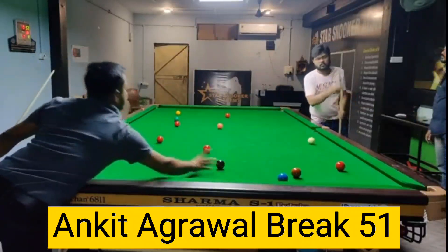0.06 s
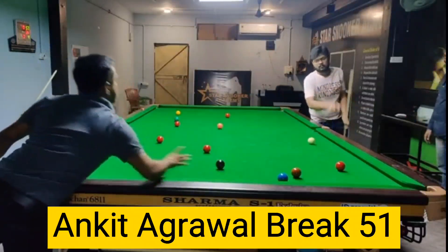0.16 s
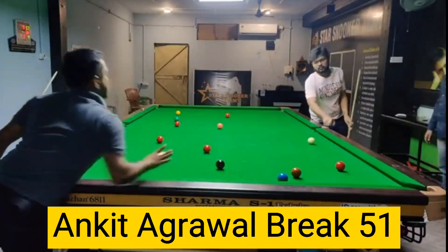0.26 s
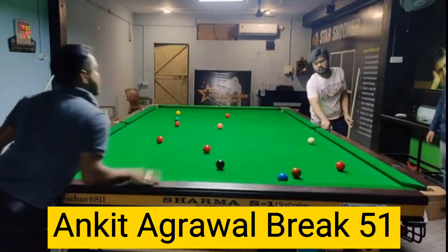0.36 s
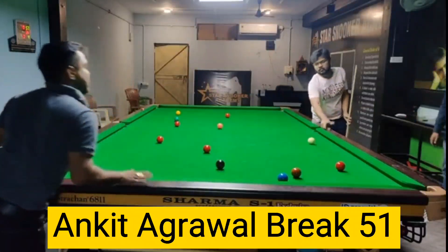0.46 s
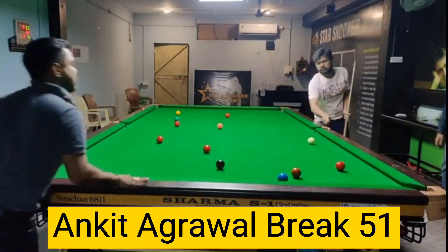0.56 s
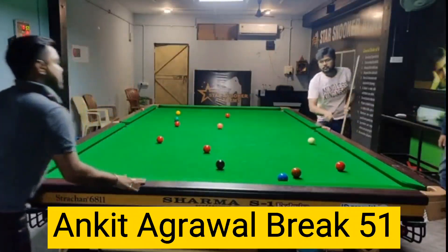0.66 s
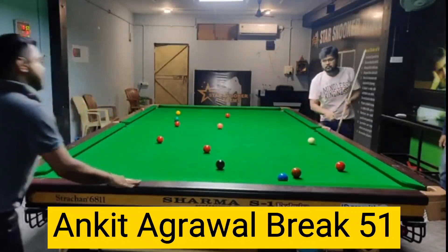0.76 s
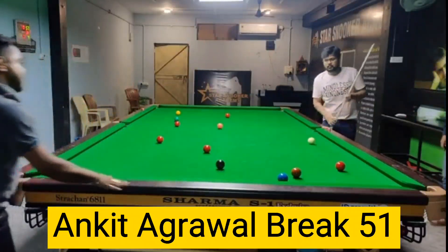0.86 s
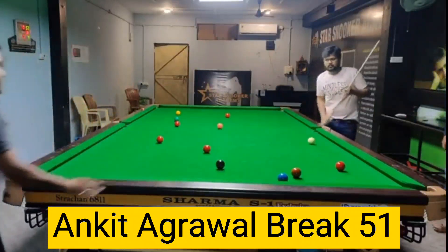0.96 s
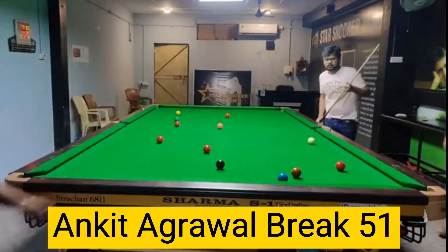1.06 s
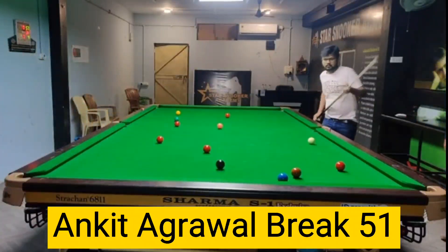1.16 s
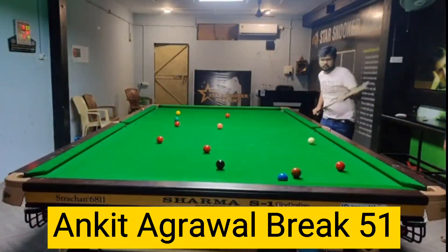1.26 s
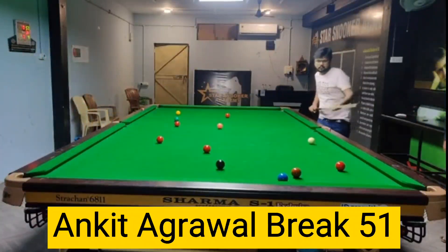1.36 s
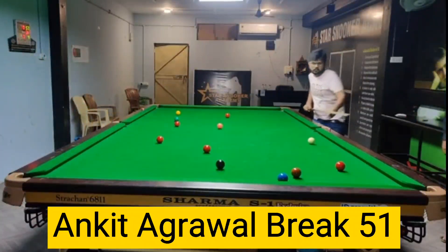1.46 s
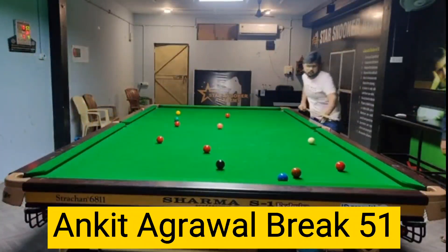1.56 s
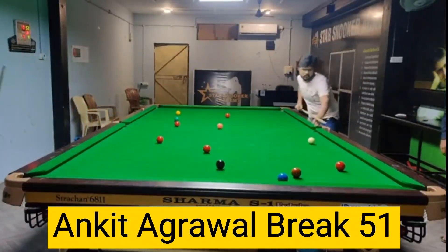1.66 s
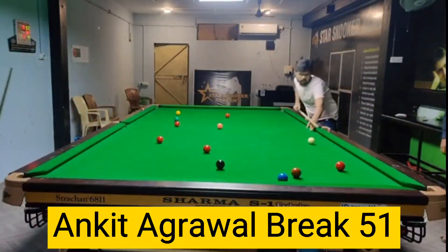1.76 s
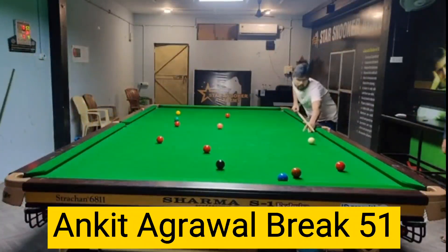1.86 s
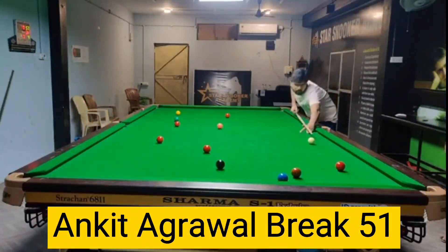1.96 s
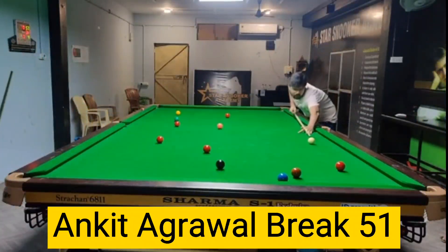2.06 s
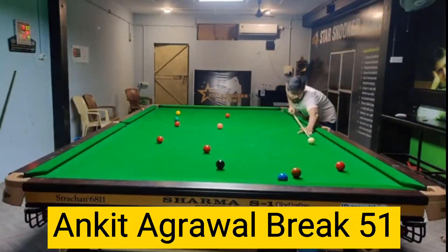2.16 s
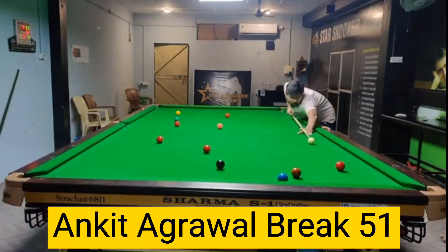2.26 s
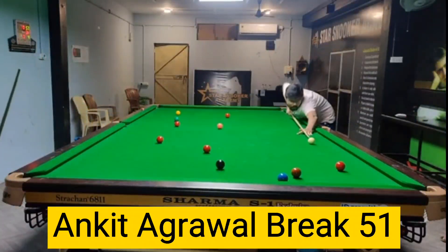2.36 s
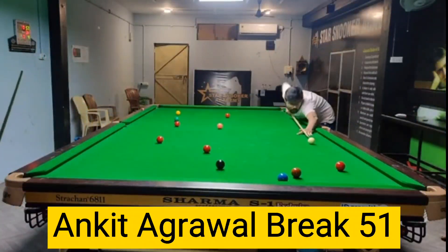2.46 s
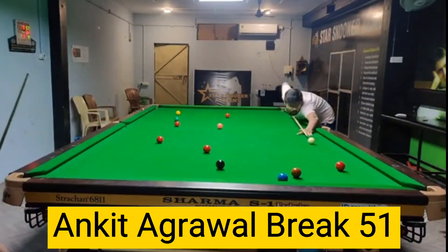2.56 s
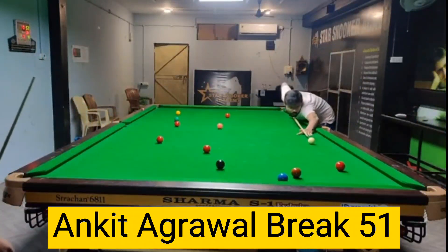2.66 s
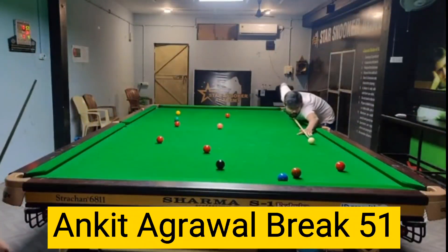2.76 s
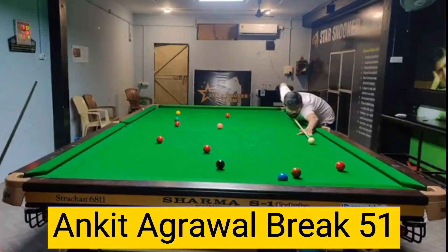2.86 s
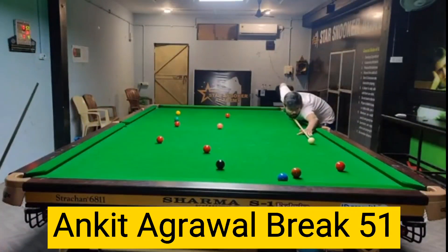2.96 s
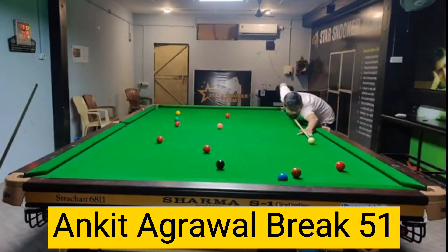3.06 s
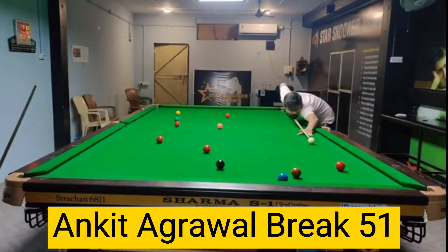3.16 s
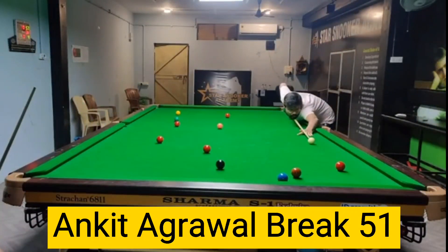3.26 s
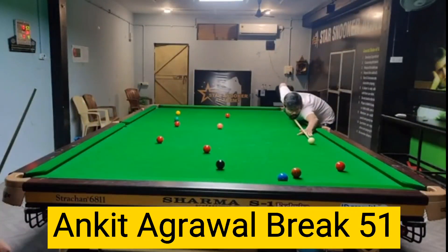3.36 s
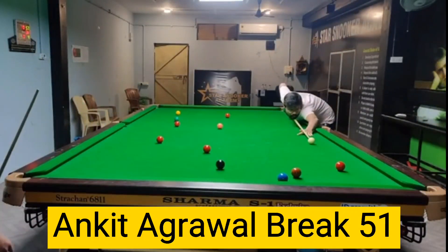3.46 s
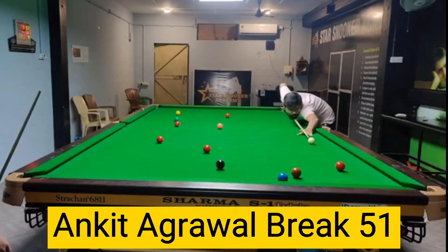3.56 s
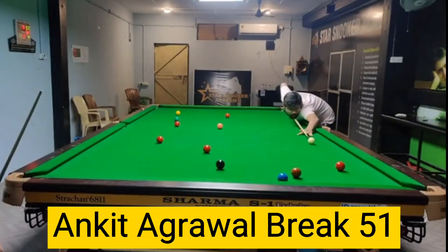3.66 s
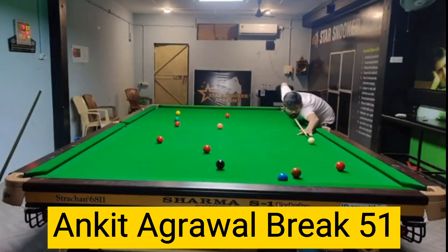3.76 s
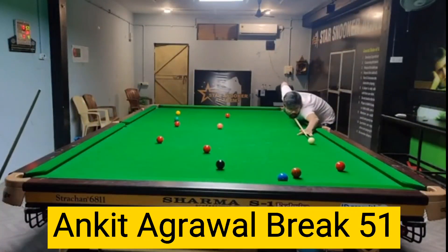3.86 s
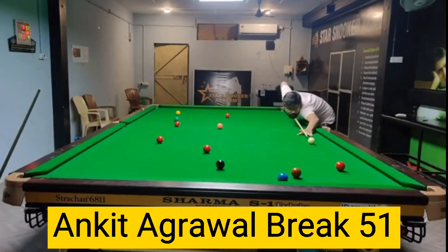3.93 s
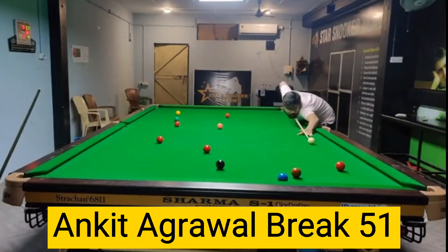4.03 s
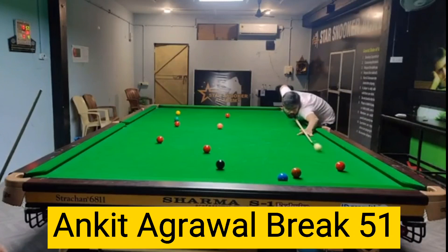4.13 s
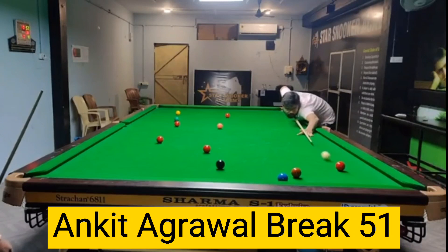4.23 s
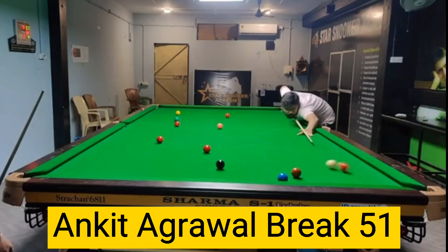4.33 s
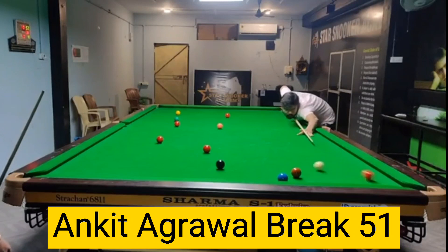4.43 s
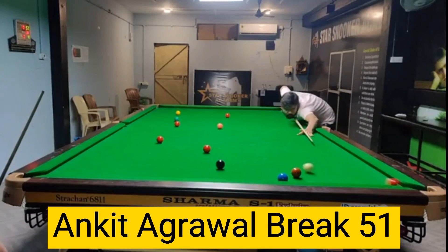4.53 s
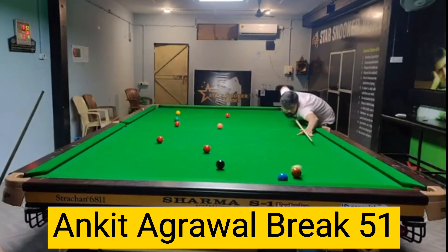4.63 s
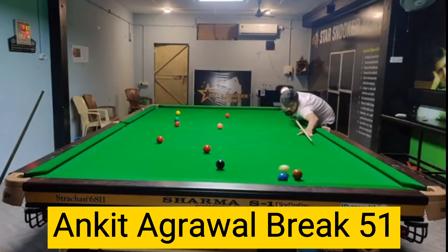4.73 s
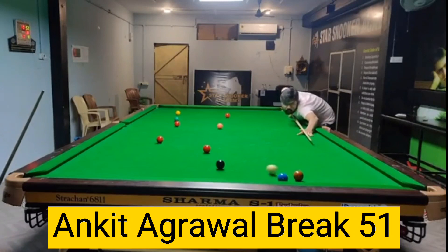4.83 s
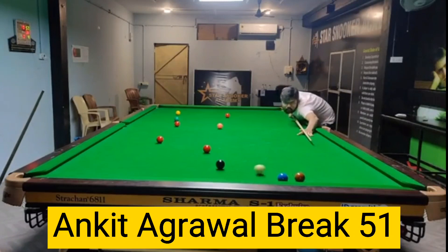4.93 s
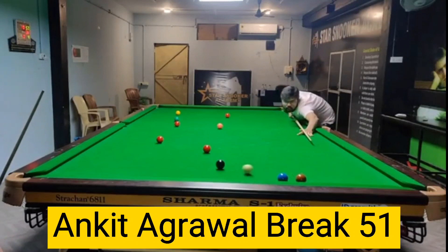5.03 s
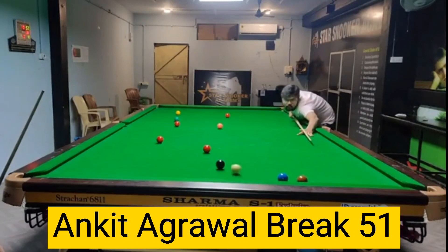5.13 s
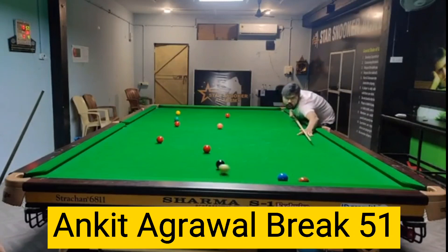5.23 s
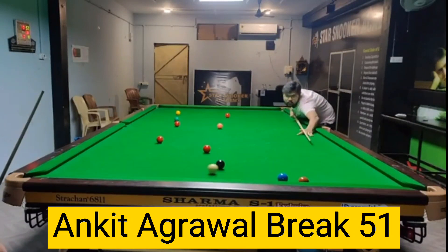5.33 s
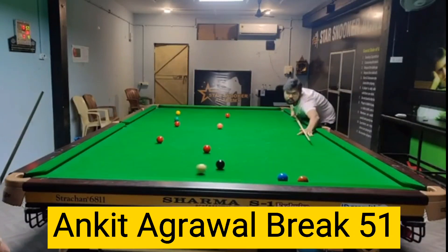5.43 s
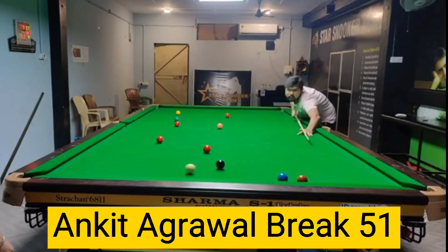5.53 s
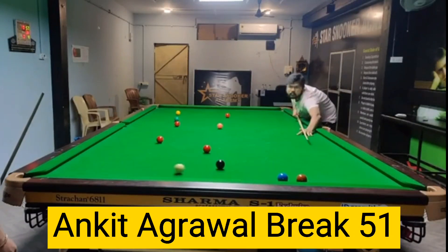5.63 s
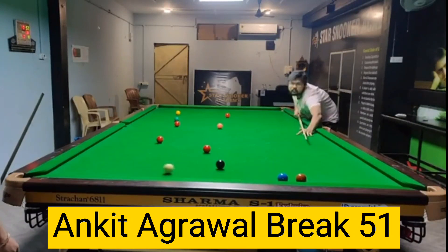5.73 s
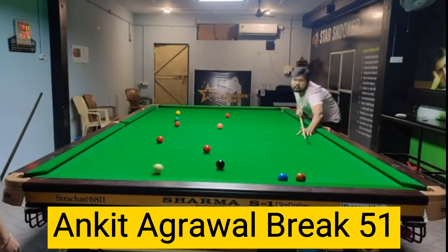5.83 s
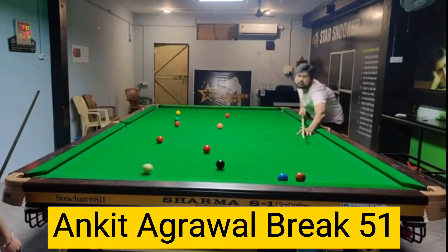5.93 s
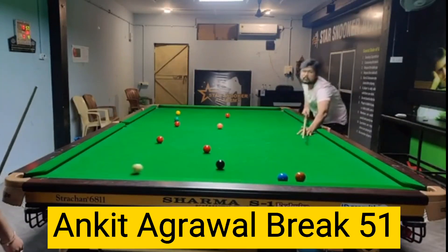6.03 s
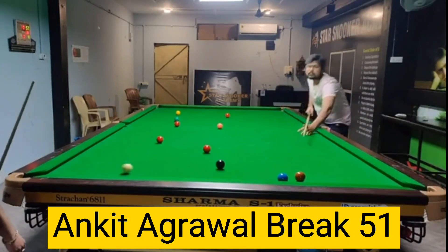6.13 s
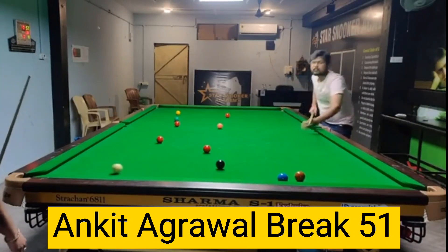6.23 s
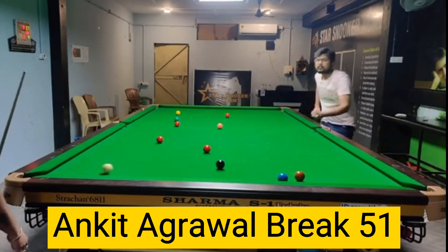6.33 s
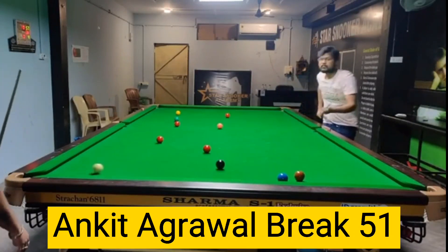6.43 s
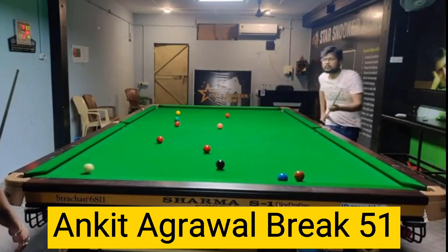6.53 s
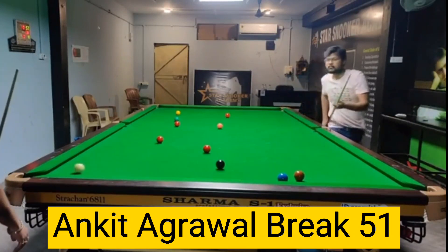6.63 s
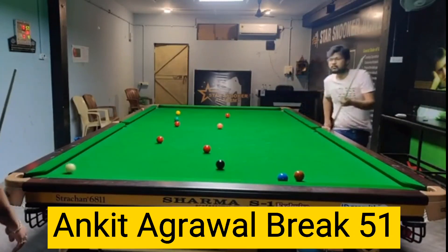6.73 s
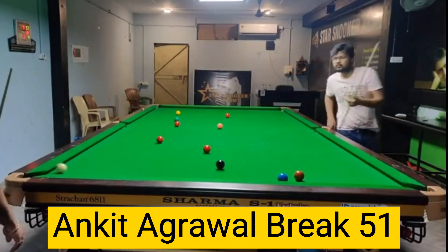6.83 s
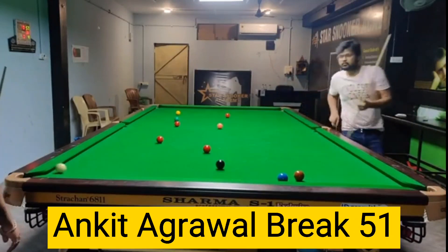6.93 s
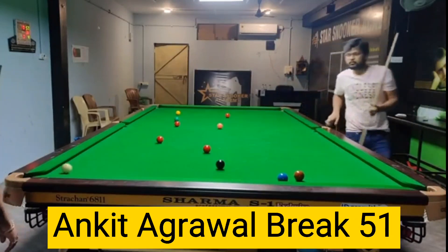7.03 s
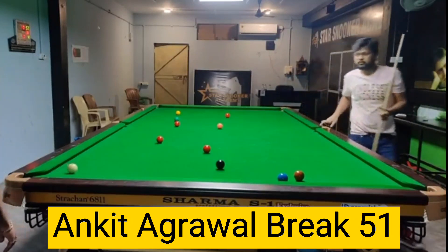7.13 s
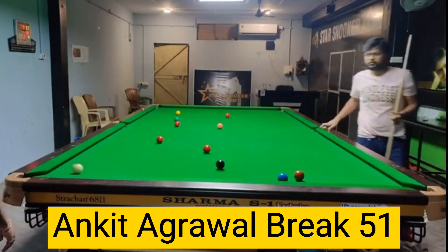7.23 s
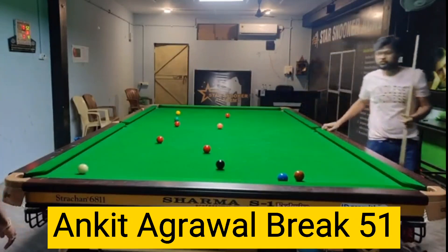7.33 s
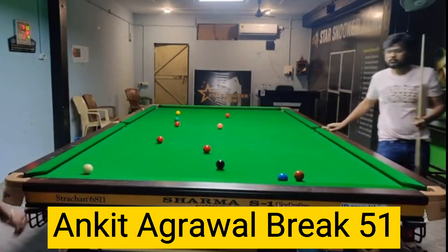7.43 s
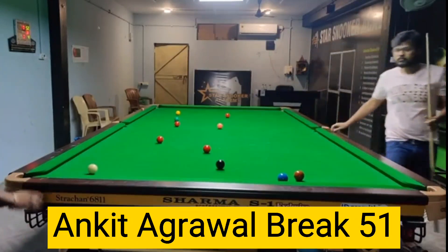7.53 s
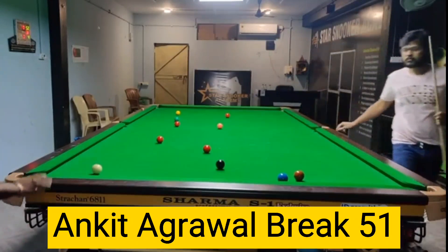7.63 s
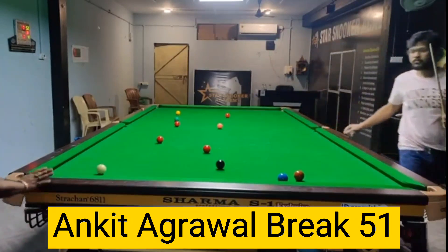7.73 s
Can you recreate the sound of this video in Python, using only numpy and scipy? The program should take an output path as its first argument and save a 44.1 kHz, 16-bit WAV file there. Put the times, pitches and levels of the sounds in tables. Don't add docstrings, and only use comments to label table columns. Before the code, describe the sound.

A snooker table in a hard, echoing room, captured by a phone with restricted treble and thin bass. Low ventilation hum and muffled traffic run throughout, the room noise swelling after each blow. A faint far tap comes at 0.1 s. Wood knocks sharply on the rail at 0.57, then bounces at 0.72, 0.85 and 0.95, with dense, boxy echoes. A rest knocks more softly on its rack at 1.58 and 1.64. Quiet follows, with faint shuffling near 2 and a barely audible motor tone around 4. At 4.24 the cue strikes loudly and woodily; at 4.51 balls clack hard and bright, ringing in the hall. A glancing kiss at 4.85 precedes rim ticks and dull leather pocket thumps from 5.01 to 5.4. Distant balls click with echo at 5.6. Faint brushing, shuffling, a tap and a soft footfall come around 6.3 to 6.9, then mostly hum until nearly 8.

```python
import sys
import numpy as np
from scipy import signal
from scipy.fft import rfft, irfft, next_fast_len
from scipy.io import wavfile
from scipy.ndimage import uniform_filter1d, map_coordinates

SR = 44100
rng = np.random.default_rng(int(sys.argv[2]) if len(sys.argv) > 2 else 0)


def int16_out(signal):
    q = np.round(np.clip(np.atleast_2d(signal).T, -1, 1) * 32767)
    wavfile.write(sys.argv[1], SR, q.astype(np.int16))


def gain_from_db(level_db):
    decades = np.asarray(level_db, float) / 20
    return 10 ** decades


N = 343532
TAIL = 6 * SR // 5

# t/s, direct peak level/dB, contact pitch f/Hz, echo level/dB, hold of the echo/s
RAIL_KNOCKS = [(.5705, -22, 1800, -22.5, 0.13)]
RAIL_BOUNCES = [
    (.7165, -23, 1400, -21, .13),
    (.8503, -11, 1600, -22.5, 0.12),
    (.945, -15, 1590, -30, 0.041),
]
REST_KNOCKS = [
    (1.580, -29, 597, -29.5, 0.086),
    (1.6445, -20, 790, -31, 0.029),
]
CUE_STRIKE = [
    (4.2392, -8.5, 760, -21, 0.2),
    (4.2394, -40, 2200, -51, 0.27),
]
BALL_CLICKS = [(4.5149, -12.5, 2190, -17.5, 0.18)]


def unit(x):
    return x / np.sqrt(np.mean(x ** 2) + 1e-20)


def along(points, hz):
    f, v = np.transpose(points)
    return np.interp(np.log(hz + 1), np.log(f + 1), v)


def coloured(x, gain):
    m = next_fast_len(len(x) + 8192)
    hz = np.fft.rfftfreq(m, 1 / SR)
    return irfft(rfft(x, m) * gain(hz), m)[:len(x)]


def wobble(rate, size=N):
    knots = rng.standard_normal(int(size * rate / SR) + 4)
    return map_coordinates(knots, [np.arange(size) * rate / SR])


def rush(spectrum, patchy_db):
    z = signal.stft(rng.standard_normal(N), nperseg=512)[2]
    field = uniform_filter1d(rng.standard_normal(z.shape), size=4, axis=0)
    field = uniform_filter1d(field, size=10, axis=1)
    x = signal.istft(z * gain_from_db(patchy_db * unit(field)), nperseg=512)[1][:N]
    return unit(coloured(x, lambda hz: gain_from_db(along(spectrum, hz))))


def echo(hold, step_db, fade, gain, grain_db, gap, burst_db):
    # f/Hz, fade speed against the mean
    absorption = [(150, 0.75), (500, 0.89), (1200, 0.89), (2500, 1.235), (4500, 1.53)]
    t = np.arange(TAIL) / SR
    scatter = np.clip(rng.standard_normal(len(t)), -2.6, 2.6)
    grains = rng.standard_normal(len(t)) * gain_from_db(grain_db * scatter * np.exp(-t / 0.18))
    body = coloured(grains, gain)
    hz, frames, z = signal.stft(body, SR, nperseg=256)
    loudness = uniform_filter1d(np.mean(np.abs(z) ** 2, axis=0), size=9)
    evened = z * (np.mean(loudness) / loudness) ** 0.65
    drop_db = 12 * frames + fade * np.maximum(frames - hold, 0)
    drop_db = along(absorption, hz)[:, None] * drop_db
    drop_db = drop_db + step_db / (1 + np.exp((hold - frames) / 0.0071))
    body = signal.istft(evened * gain_from_db(-drop_db), SR, nperseg=256)[1][:len(t)]
    body = body / np.sqrt(np.mean(body[:SR // 25] ** 2))
    onset = 1 - np.exp(-(t / gap) ** 2)
    near_walls = gain_from_db(burst_db * np.exp(-t / 0.018))
    return body * onset * near_walls


def blows(rows, colour, rings, ring_db, grain_db, gap, burst_db, cycles, step_db, fade):
    def gain(hz):
        peaks = sum(gain_from_db(2 * (db + ring_db)) / (1 + (2 * (hz - c) / w) ** 2) ** 2 for c, w, db in rings)
        return np.sqrt(gain_from_db(2 * along(colour, hz)) + peaks)

    out = np.zeros(N + TAIL)
    t = np.arange(-256, 256) / SR
    for s, peak_db, hz, echo_db, hold in rows:
        at = round(s * SR)
        pulse = np.sin(2 * np.pi * hz * t) * np.exp(-(t * hz / cycles) ** 2)
        out[at - len(t) // 2:][:len(t)] -= gain_from_db(peak_db + 4) * pulse
        out[at:][:TAIL] += gain_from_db(echo_db) * echo(hold, step_db, fade, gain, grain_db, gap, burst_db)
    return out[:N]


def slaps(rows, gain_db, cycles, glide):
    s, db, hz = np.transpose(rows)[:, :, None]
    offset = np.arange(-512, 512)
    turns = hz * offset / SR
    pulse = np.cos(2 * np.pi * turns * (1 + glide * turns)) * np.exp(-(turns / cycles) ** 2)
    pulse = gain_from_db(db + gain_db) * pulse
    places = np.round(s * SR).astype(int) + offset
    return np.bincount(places.ravel(), pulse.ravel(), N)


def ringing(s, modes, level_db, waver):
    out = np.zeros(N + SR)
    t = np.arange(SR) / SR
    for hz, db, t60 in modes:
        bend = waver * wobble(25, size=SR)
        decay_db = 60 * t / np.clip(t60, .2, 1.5)
        envelope = gain_from_db(level_db + db - decay_db + 2.7 * bend) * (1 - np.exp(-t / 0.0059))
        out[round(s * SR):][:SR] += envelope * np.sin(2 * np.pi * hz * t + bend)
    return out[:N]


def shot():
    # t/s, direct peak level/dB, f/Hz, echo level/dB, hold/s
    kisses = [
        (4.8456, -22, 1700, -31.5, 0.028),
        (5.092, -28.5, 2170, -48, 0.074),
    ]
    # f/Hz, spectral level/dB per Hz
    cue_colour = [(88, -40), (150, -14.5), (400, -4.5), (701, -5.5), (796, -4), (1500, -16), (2140, -6.5),
                  (2580, -12.5), (2770, -16.5), (3570, -18), (4410, -28.5), (5730, -59), (9700, -120)]
    ball_colour = [(240, -44.5), (400, -15), (499, -34), (541, -23.5), (709, -14.5), (1230, -4.5),
                   (1350, -3), (2160, 2), (3330, -8.5), (4410, -42.5), (5730, -75), (9700, -120)]
    # f/Hz, width/Hz, level/dB
    cue_rings = [(600, 200, -12.5), (800, 23, -6), (1097, 61, -4), (1340, 84, -4), (1650, 43, -4.5),
                 (1810, 64, -1), (2160, 91, 5), (2560, 38, 0), (2950, 48, -17.5), (3080, 48, -11.5),
                 (3454, 120, -10.5), (3900, 55, -11), (4530, 47, -35)]
    ball_rings = [(1270, 22, -9.5), (2120, 220, 10.5), (2600, 55, -4), (3650, 35, -26)]
    return (blows(CUE_STRIKE, cue_colour, cue_rings, ring_db=2.0, grain_db=4, gap=0.0049,
                  burst_db=5.0, cycles=0.53, step_db=1.4, fade=30)
            + blows(BALL_CLICKS, ball_colour, ball_rings, ring_db=-17, grain_db=5.0, gap=0.0035,
                    burst_db=-2.5, cycles=1.5, step_db=6.0, fade=25.4)
            + blows(kisses, ball_colour, ball_rings, ring_db=-14, grain_db=12.0, gap=0.0026,
                    burst_db=0.0, cycles=0.83, step_db=5.5, fade=29.0))


def woodwork():
    # f/Hz, spectral level/dB per Hz
    rail_colour = [(71, -35), (120, -9), (259, 2.5), (426, -9.5), (593, -0.5), (1020, -12), (1300, 1.5),
                   (1610, -9.5), (2010, -4), (2200, -4), (3120, -19), (4450, -32), (4750, -53), (5730, -66),
                   (9700, -120)]
    bounce_colour = [(71, -38.5), (120, -14), (251, 3.5), (413, -3.5), (755, -6), (919, -10.5),
                     (1490, -10.5), (1630, -12), (1780, -5), (2070, -10.5), (2550, -20.5), (2810, -36),
                     (3210, -30.5), (4410, -50.5), (5730, -75), (9700, -120)]
    rest_colour = [(88, -41), (150, -6.5), (276, 0), (317, -10), (559, -3.5), (1170, -12.5), (1440, -12),
                   (2030, -15.5), (2650, -20), (4050, -34.5), (4410, -44), (5730, -73), (9700, -120)]
    # f/Hz, width/Hz, level/dB
    rail_rings = [(233, 100, 0), (660, 63, 4.5), (1275, 45, -0.5), (1780, 104, 2.5), (2020, 170, 0.5),
                  (2380, 49, -2.5), (3160, 250, -11), (3700, 260, -17.5), (4320, 300, -35)]
    bounce_rings = [(263, 110, -10.5), (734, 200, 0), (1286, 110, -6), (1478, 53, 3.5), (1740, 110, -5.5),
                    (2150, 140, -12.5), (2520, 70, -14), (3160, 670, -22.5), (3800, 270, -36),
                    (4200, 38, -48)]
    rest_rings = [(375, 110, -6), (597, 70, -8), (1292, 25, -4), (1452, 54, -2.5), (1723, 72, -7),
                  (2120, 120, -24), (2620, 69, -12), (3120, 150, -24), (3510, 40, -22), (3890, 86, -25)]
    return (blows(RAIL_KNOCKS, rail_colour, rail_rings, ring_db=3.0, grain_db=4.0, gap=0.00047,
                  burst_db=2.0, cycles=0.51, step_db=2, fade=50)
            + blows(RAIL_BOUNCES, bounce_colour, bounce_rings, ring_db=0.0, grain_db=4.5, gap=0.0025,
                    burst_db=5.5, cycles=1.0, step_db=8, fade=33.0)
            + blows(REST_KNOCKS, rest_colour, rest_rings, ring_db=2.5, grain_db=3.5, gap=0.0048,
                    burst_db=3.5, cycles=0.95, step_db=5.5, fade=31.4))


def shafts():
    # f/Hz, level/dB, t60/s
    rail_modes = [(265, -4.5, 4.5), (318, 1, 0.9), (374, 2, 1.6), (597, -1, 3.8), (1258, -5, 5.0),
                  (1750, -6, 0.77), (1850, -17, 1.3), (2000, 2, 0.9), (2060, -6, 1), (2320, -6, 0.18),
                  (2530, -10, 2.3)]
    rest_modes = [(420, 7, 0.48), (560, -12, 5.0), (715, 5.5, 0.31), (860, -11, 5.0), (1440, -3, 0.73),
                  (1750, -9, 0.55), (2680, -4, 0.33), (3830, -26, .3)]
    cue_modes = [(555, -4, 1.2), (800, 1, .4), (1870, -7, .9), (1830, -8.5, .9), (2145, -8, 2),
                 (2167, -11, 1), (2544, -3, 1.2), (2600, -9.5, 1.4), (3000, -19.5, 0.99), (3550, -19.5, .8),
                 (3600, -16, 0.8), (3915, -24, 0.97), (3945, -27.5, .9)]
    return (ringing(.571, rail_modes, level_db=-31.0, waver=0.92)
            + ringing(1.582, rest_modes, level_db=-35.5, waver=1.0)
            + ringing(4.253, cue_modes, level_db=-29.5, waver=0.53))


def walls():
    # t/s, peak level/dB, f/Hz
    rail_slaps = [(0.5746, 1, 1720), (0.5836, -8, 1340), (0.5919, -15, 1230), (0.6035, -17, 1190),
                  (0.6116, -21, 1470), (0.6336, -14, 1930), (0.6465, -12, 1470), (0.6694, -14, 1120),
                  (0.6777, -17, 1670), (0.6935, -14, 1690), (0.6978, -13, 1690), (0.7165, -11, 1420),
                  (0.72, 0, 1450), (0.7245, -7.5, 1400), (0.7288, 1, 1500), (0.7335, -1.5, 1450),
                  (0.7474, -14, 900), (0.7529, -19, 970), (0.7774, -19, 1130), (0.7831, -16, 1030),
                  (0.7953, -17, 1190), (0.8145, -30, 680), (0.8353, -15, 1540), (0.8388, -18, 1190),
                  (0.8504, -11, 1560), (0.854, 1.5, 1150), (0.8598, -13, 1010), (0.8685, -14, 980),
                  (0.8821, -14, 830), (0.8852, -19, 820), (0.8903, -12, 990), (0.9029, -6.5, 517),
                  (0.9081, -6, 1510), (0.9129, -12, 1190), (0.9185, -17, 1000), (0.9445, -2, 1170),
                  (0.9707, -7, 940), (0.9756, -13, 990), (0.9975, -19, 760), (1.0024, -28, 1190),
                  (1.0418, -15, 650), (1.0532, -11.5, 600)]
    rest_slaps = [(1.5865, -32, 700), (1.5917, -23, 760), (1.5973, -26, 880), (1.6155, -24, 990),
                  (1.6245, -16, 770), (1.6339, -15, 660), (1.6465, -19, 720), (1.6511, -16.2, 630),
                  (1.6715, -30, 660), (1.6871, -22, 860), (1.6981, -11, 690), (1.704, -17, 610),
                  (1.7091, -19, 1040), (1.73, -21, 840), (1.7354, -26, 640), (1.7441, -34, 910),
                  (1.76, -28, 800), (1.769, -35, 890)]
    cue_slaps = [(4.2447, -5.5, 850), (4.2549, -4, 2170), (4.2605, -20, 1570), (4.2893, -4, 830),
                 (4.3113, -1, 1770), (4.319, -5, 1750), (4.3238, -16, 1510), (4.3321, -2, 2060),
                 (4.3515, -9, 1830), (4.3568, -9, 1740), (4.3651, -9, 1900), (4.371, -17, 1540),
                 (4.3756, -32, 830), (4.3824, -5, 1630), (4.3926, -17, 1850), (4.4051, -18, 1650),
                 (4.4159, -4, 1780), (4.4598, -6, 1880), (4.4753, -10, 1064), (4.4951, -6, 1950)]
    ball_slaps = [(4.5228, 2, 1890), (4.5288, -8, 2160), (4.5343, -15, 2150), (4.5428, -15, 1880),
                  (4.5473, -2, 2180), (4.561, -6, 2210), (4.5666, -1.5, 2260), (4.5718, 0, 2010),
                  (4.5773, -10, 1820), (4.5813, -6, 1890), (4.5925, -9, 2160), (4.6005, -5, 2000),
                  (4.6066, -17, 2120), (4.6196, 2, 2120), (4.6296, -5.5, 1990), (4.6366, -21, 1870),
                  (4.6491, -13, 2030), (4.6606, -17.5, 2020), (4.6727, -16, 2170), (4.6796, -4, 2330),
                  (4.686, -13, 2160), (4.69, -13, 1960), (4.6946, -17, 2020), (4.7017, -3, 2280),
                  (4.7125, -8, 1920), (4.7177, -18, 1790)]
    far_slaps = [(5.5878, -27, 1200), (5.5928, -31, 1810), (5.5962, -25, 2270), (5.603, -26, 1440),
                 (5.6084, -5.5, 2200), (5.6144, -10, 2140), (5.6441, -25, 1530), (5.6519, -25, 1700),
                 (5.6671, -28, 2480), (5.6704, -22, 1830), (5.665, -25, 2900), (5.6725, -22, 2950),
                 (5.6787, -24.0, 1630), (5.6869, -28, 1470), (5.6941, -21, 1640), (5.7018, -15, 1530),
                 (5.7045, -28, 2600), (5.7085, -22, 1420)]
    # t/s, peak level/dB, f/Hz
    cracks = [
        (4.5158, -0.5, 2310),
        (4.8472, -8.5, 1770),
    ]
    answers = (slaps(rail_slaps, gain_db=-10.5, cycles=0.93, glide=.03)
               + slaps(rest_slaps, gain_db=-6, cycles=0.64, glide=.03)
               + slaps(cue_slaps, gain_db=-10.5, cycles=1.1, glide=0.034)
               + slaps(ball_slaps, gain_db=-7.5, cycles=1.2, glide=0.13)
               + slaps(far_slaps, gain_db=-6, cycles=0.71, glide=.05)
               + slaps(cracks, gain_db=-1.0, cycles=1.3, glide=0.22))
    edge_hz = 3800
    return coloured(answers, lambda hz: 1 / (1 + (hz / edge_hz) ** 24))


def pocket():
    # t/s, peak level/dB, f/Hz
    rim_taps = [(5.0143, -24.5, 725), (5.032, -27, 780), (5.0454, -26, 750), (5.0665, -31, 680),
                (5.0874, -39, 698), (5.0996, -23, 750), (5.1184, -30, 725), (5.13, -26, 820),
                (5.142, -28, 810), (5.154, -34, 744), (5.1722, -31, 710), (5.2203, -23.5, 715),
                (5.2539, -41, 730), (5.2748, -45, 660), (5.2919, -44, 734)]
    # t of the peak/s, level/dB, f/Hz
    bumps = [(5.018, -32, 445), (5.034, -14.5, 349), (5.049, -29, 437), (5.0677, -16.5, 349),
             (5.081, -26, 350), (5.103, -21, 371), (5.1155, -18, 372), (5.1408, -26, 342),
             (5.161, -26, 270), (5.177, -42, 420), (5.201, -28, 420), (5.2209, -25, 403),
             (5.2413, -41, 380), (5.274, -52, 357), (5.297, -46, 352), (5.087, -25, 231), (5.13, -27, 235),
             (5.148, -41, 500), (5.222, -30, 258), (5.33, -31.5, 222), (5.385, -30, 373)]
    # t/s, direct peak level/dB, f/Hz, echo level/dB, hold/s
    lip_blow = [(5.012, -34, 700, -33.5, .038)]
    drop_blow = [(5.030, -44, 350, -34, 0.19)]
    # f/Hz, spectral level/dB per Hz
    lip_colour = [(250, -40), (450, -11), (700, -2), (900, -14.5), (1300, -7), (2500, -21), (4000, -96)]
    pouch_colour = [(88, -46), (150, -8), (240, -7), (356, -6), (428, -7.5), (534, -7.5), (1000, -34),
                    (1300, -25), (2200, -120)]
    # f/Hz, width/Hz, level/dB
    pouch_rings = [(366, 45, -13), (786, 70, -16)]
    rise_s, t60_s = .004, .06
    out = slaps(rim_taps, gain_db=-5.5, cycles=2.2, glide=0.009)
    t = np.arange(SR // 4) / SR
    for s, db, hz in bumps:
        swell = (1 - np.exp(-t / rise_s)) ** 2 * gain_from_db(db + 7.5 - 60 * t / t60_s)
        out[round((s - 1.5 * rise_s) * SR):][:len(t)] += swell * np.sin(2 * np.pi * hz * t)
    out += blows(lip_blow, lip_colour, [], ring_db=0, grain_db=2.5, gap=.003,
                 burst_db=-1.0, cycles=0.79, step_db=1.5, fade=86)
    return out + blows(drop_blow, pouch_colour, pouch_rings, ring_db=-10, grain_db=3, gap=0.0042,
                       burst_db=10.5, cycles=.6, step_db=4.0, fade=20.0)


def snap():
    t = np.arange(N) / SR
    bright = rng.standard_normal(N)
    bright = unit(coloured(bright, lambda hz: np.exp(-((hz - 5000) / 1100) ** 2)))
    level_db, length_s = -56.5, 0.0036
    first_blows = [(RAIL_KNOCKS[0][0] + 0.0065, -1.5), (RAIL_BOUNCES[0][0], -3), (CUE_STRIKE[0][0] + 0.016, 1.5),
                   (BALL_CLICKS[0][0] + .004, -3), (REST_KNOCKS[0][0] + 0.0069, -12)]
    return bright * sum(gain_from_db(level_db + db) * np.exp(-((t - s) / length_s) ** 2) for s, db in first_blows)


def other_tables():
    # t/s, direct peak level/dB, f/Hz, echo level/dB, hold/s
    clicks = [
        (5.590, -25.5, 3030, -30.5, 0.091),
        (5.6083, -29, 2040, -38, 0.068),
    ]
    tick = [(5.305, -55, 3000, -51, 0.051)]
    brush = [(6.56, -65, 2190, -57, 0.11)]
    taps = [
        (.09, -54, 2500, -62.5, 0.04),
        (.512, -70, 1990, -52.5, .195),
        (6.832, -60, 1800, -45, 0.031),
    ]
    footfall = [(6.845, -56, 200, -43.5, 0.13)]
    shuffles = [
        (1.325, -70, 2000, -56, 0.14),
        (1.96, -70, 2500, -58, 0.094),
        (6.34, -58, 2540, -56.5, 0.15),
        (6.79, -70, 1800, -46.5, .14),
    ]
    # f/Hz, spectral level/dB per Hz
    click_colour = [(88, -32), (150, 3.5), (195, -0.5), (243, -19), (404, -14), (944, -6), (1230, -13),
                    (1340, -1.5), (2690, -5.5), (2880, -3), (3350, -11), (3600, -30), (4410, -39),
                    (5730, -66.5), (9700, -120)]
    tick_colour = [(710, -28), (1200, -2), (1690, -1), (2210, -4), (2690, -12), (3100, -4), (4410, -24),
                   (5730, -49), (9700, -120)]
    brush_colour = [(710, -35), (1200, -7), (2200, -4), (2330, 2), (2560, -12), (3010, -7), (4410, -25),
                    (5730, -52), (9700, -120)]
    tap_colour = [(350, -36), (600, -20), (1360, -0.5), (1570, -6), (1750, 2.5), (1960, -5.5), (2290, -5.5),
                  (2480, -13), (2870, -6.5), (3290, -8), (3750, -16), (4410, -22.5), (5730, -54.5),
                  (9700, -120)]
    thud_colour = [(70, -31), (110, -5), (190, 2), (300, -11), (500, -16), (900, -61)]
    # f/Hz, width/Hz, level/dB
    click_rings = [(372, 140, 4.5), (1210, 140, 4.5), (1833, 41, 5.5), (2030, 24, 6), (2410, 14, -6),
                   (2500, 73, -12), (2940, 69, -21)]
    return (blows(clicks, click_colour, click_rings, ring_db=-2.5, grain_db=4.5, gap=0.0022,
                  burst_db=7.5, cycles=2.4, step_db=4.5, fade=30.3)
            + blows(tick, tick_colour, [], ring_db=0, grain_db=5, gap=0.0051,
                    burst_db=11.0, cycles=0.5, step_db=1.0, fade=53)
            + blows(brush, brush_colour, [], ring_db=0, grain_db=8, gap=0.02,
                    burst_db=10.0, cycles=0.97, step_db=0.5, fade=18)
            + blows(taps, tap_colour, [], ring_db=0, grain_db=-1.0, gap=0.019,
                    burst_db=2.0, cycles=1.0, step_db=1.5, fade=47)
            + blows(footfall, thud_colour, [], ring_db=0, grain_db=6.0, gap=0.029,
                    burst_db=-2.0, cycles=1.0, step_db=6.5, fade=53)
            + blows(shuffles, tap_colour, [], ring_db=0, grain_db=0.0, gap=.055,
                    burst_db=24.0, cycles=1.0, step_db=1.5, fade=20))


def gate(play):
    # centre f/Hz, threshold level/dB, opening/dB per dB over it
    gate_bands = [
        (260, -48.5, 0.11),
        (1700, -68, 0.1718),
        (3400, -75.5, 0.1138),
    ]
    watch_s = 0.013
    open_db = np.zeros(N)
    for centre_hz, threshold_db, ratio in gate_bands:
        band = coloured(play, lambda hz: np.exp(-2 * np.log2((hz + 1) / centre_hz) ** 2))
        power = np.abs(uniform_filter1d(band ** 2, size=round(watch_s * SR)))
        open_db += ratio * 10 * np.log10(1 + power / gain_from_db(2 * threshold_db))
    return open_db


def hall(open_db):
    # t/s, swell level/dB
    street = [(0, 0), (1.3, 4.5), (2.1, 1.8), (3.4, -0.1), (3.7, 1.5), (3.9, 1), (4.1, 3.5), (5.3, 6),
              (6.7, 0.3), (7.2, 2), (7.55, 5), (7.79, 5.5)]
    # f/Hz, spectral level/dB per Hz
    hum_colour = [(15, -41), (25, -17.5), (42, -8), (52, -14), (70, -14), (91, -5), (167, -3), (189, -2.5),
                  (275, -9), (299, -11), (395, -12), (430, -13.5), (700, -19.5), (910, -40), (1540, -120)]
    # f/Hz, spectral level/dB per Hz
    air_colour = [(150, -26.5), (400, -13.5), (800, -5.5), (1300, -13), (2500, -24), (4000, -32.5),
                  (5000, -42.5), (5600, -65.5)]
    # f/Hz, spectral level/dB per Hz
    hiss_colour = [(4300, -20), (5000, -6), (5600, -6), (6500, -2), (7300, 0), (8000, 0), (8200, -30)]
    # f/Hz, spectral level/dB per Hz
    sizzle_colour = [(7900, -30), (8200, 0), (10700, 0), (11500, -8), (12000, -16), (12600, -16),
                     (12800, -1), (14700, -1), (15500, -9)]
    # f/Hz, spectral level/dB per Hz
    still_colour = [(8000, -30), (8300, 0), (15000, -2), (15500, -9)]
    # t/s, level/dB
    whine_level = [(3.3, -89), (3.8, -68), (4.02, -65), (4.06, -57.5), (4.22, -67), (4.3, -87)]
    t = np.arange(N) / SR
    street_db = np.interp(t, *np.transpose(street))
    dip_db, recovery_s = 6.5, .09
    after = t - BALL_CLICKS[0][0]
    duck_db = dip_db * (after > 0) * np.exp(-np.abs(after) / recovery_s)
    hum_db = -49.5 + 0.83 * open_db + 0.48 * street_db + 0.61 * wobble(3.4)
    hum = gain_from_db(hum_db) * rush(hum_colour, patchy_db=1.07)
    air_db = -59 + 1.13 * np.minimum(open_db, 12.5) + street_db
    air = gain_from_db(air_db) * rush(air_colour, patchy_db=1.9)
    hiss = gain_from_db(-82.0 + open_db - duck_db) * rush(hiss_colour, patchy_db=0.1)
    sizzle_db = -88.0 + 1.08 * np.minimum(open_db, 11) - 1.1 * duck_db
    sizzle = gain_from_db(sizzle_db) * rush(sizzle_colour, patchy_db=-1.0)
    whine_db = np.interp(t, *np.transpose(whine_level)) + 3 * wobble(27)
    whine = gain_from_db(whine_db) * np.sin(2 * np.pi * 970 * t + 1.3 * wobble(7.1))
    still_db = -86.5 - 1.3 * np.maximum(open_db - 4.0, 0)
    still = gain_from_db(still_db) * rush(still_colour, patchy_db=1.5)
    return hum + air + hiss + sizzle + whine + still


def scene():
    play = woodwork() + shafts() + shot() + walls() + pocket() + other_tables()
    return (play + hall(gate(play)) + snap())[None]


def top_cut(x):
    return signal.sosfilt(signal.butter(12, 15500, fs=SR, output="sos"), x)


def record(dry):
    heard = coloured(dry[0], lambda hz: 1 / np.sqrt(1 + (70 / (hz + 1)) ** 4))
    return top_cut(heard[None])


dry = scene()
out = record(dry)
int16_out(out)
```